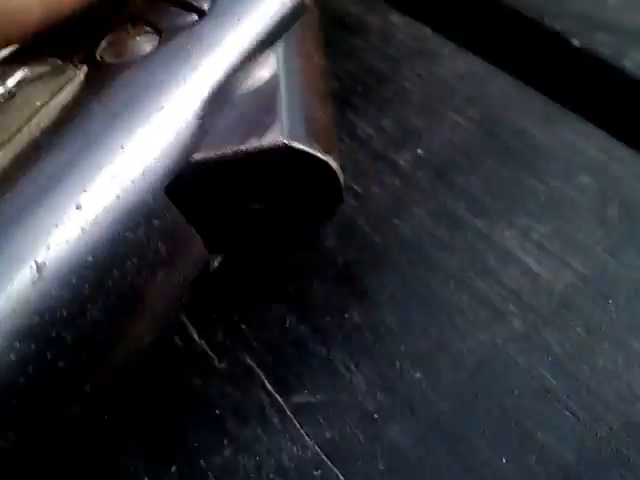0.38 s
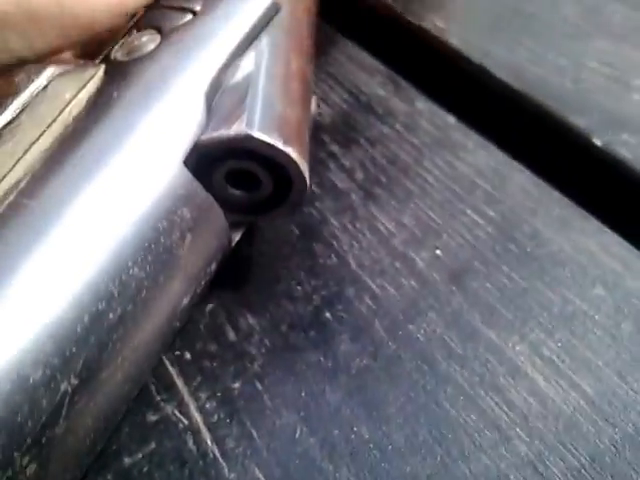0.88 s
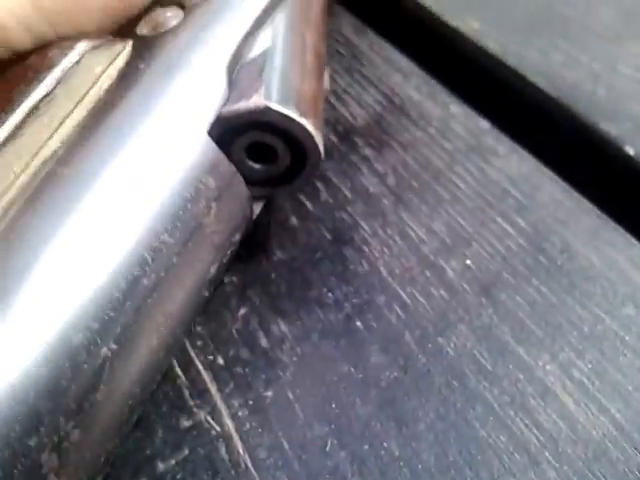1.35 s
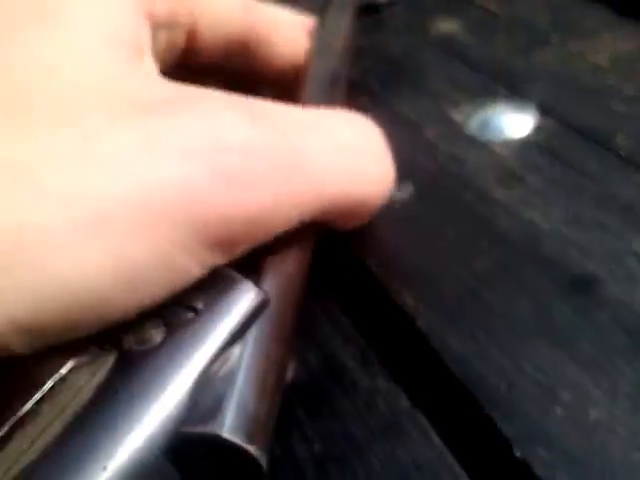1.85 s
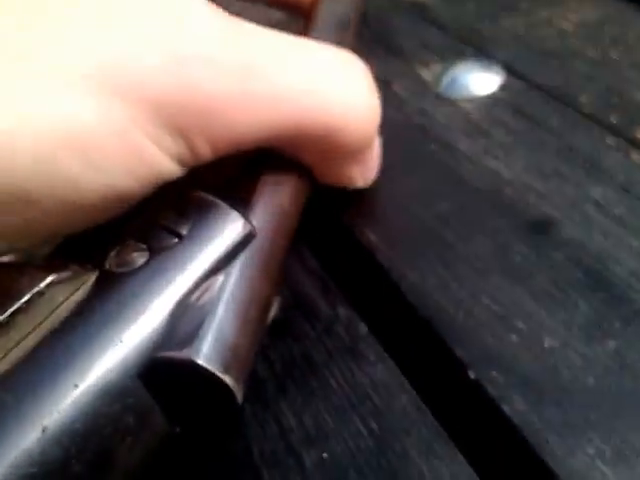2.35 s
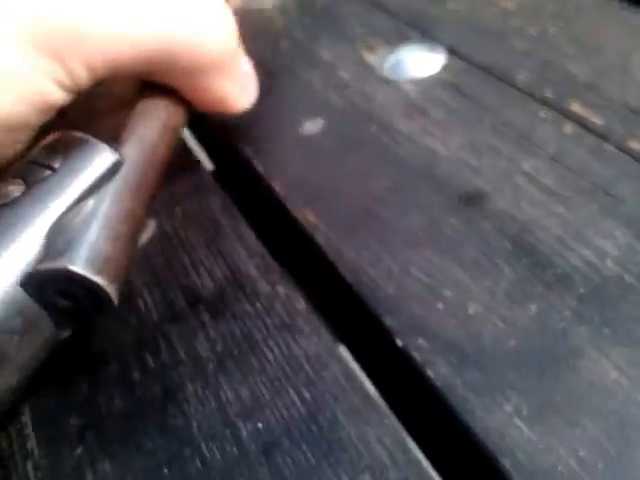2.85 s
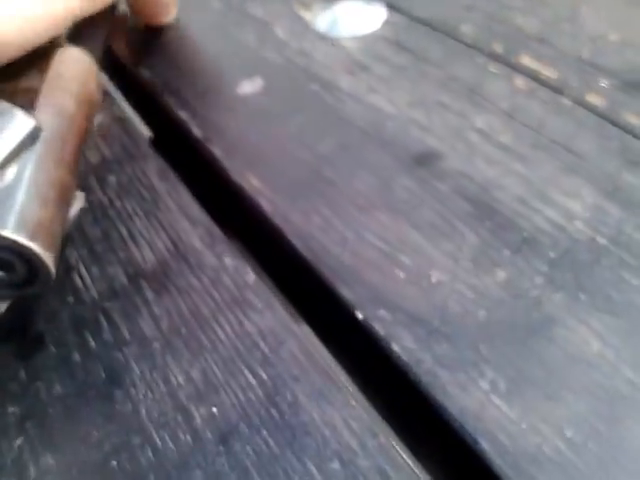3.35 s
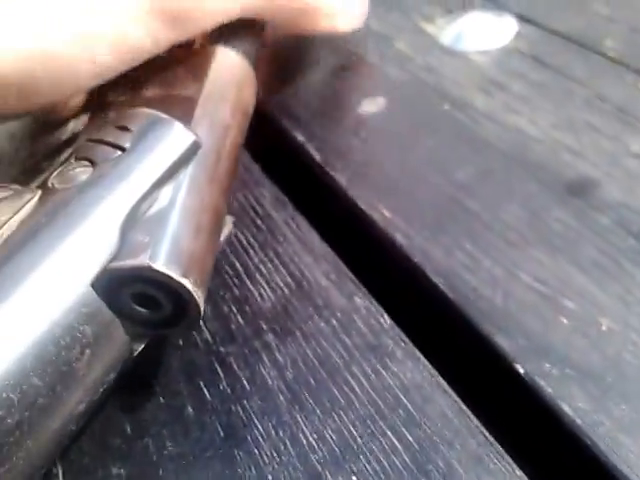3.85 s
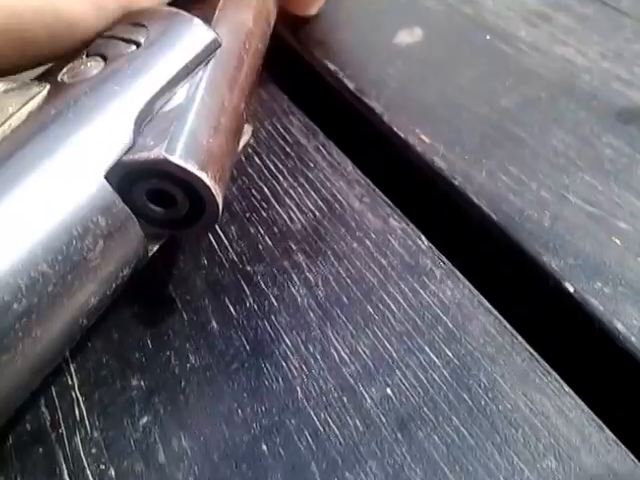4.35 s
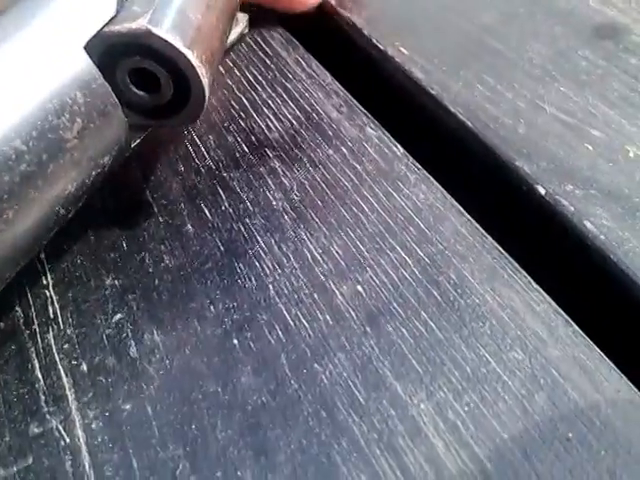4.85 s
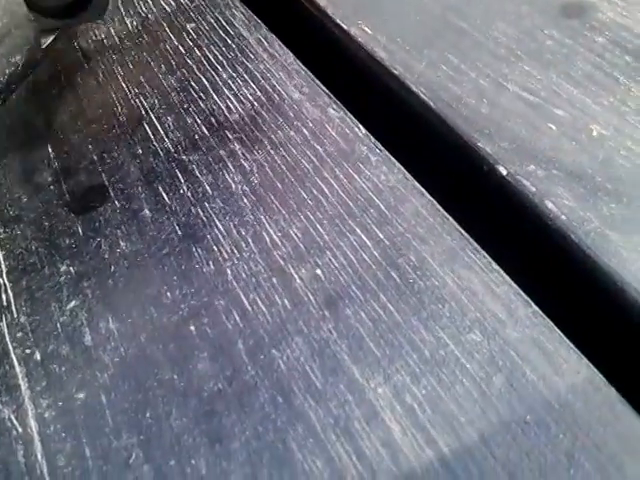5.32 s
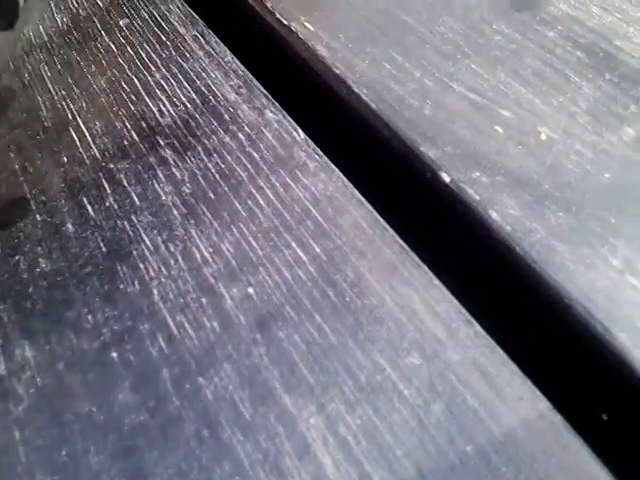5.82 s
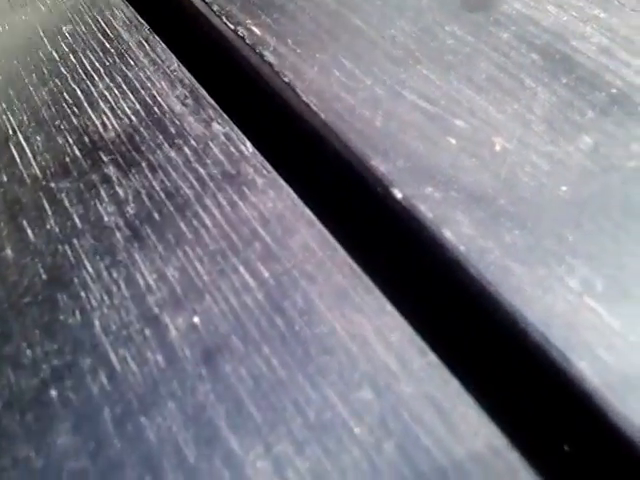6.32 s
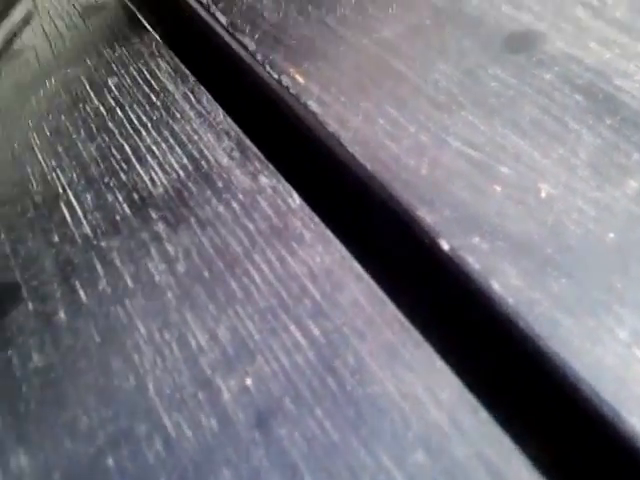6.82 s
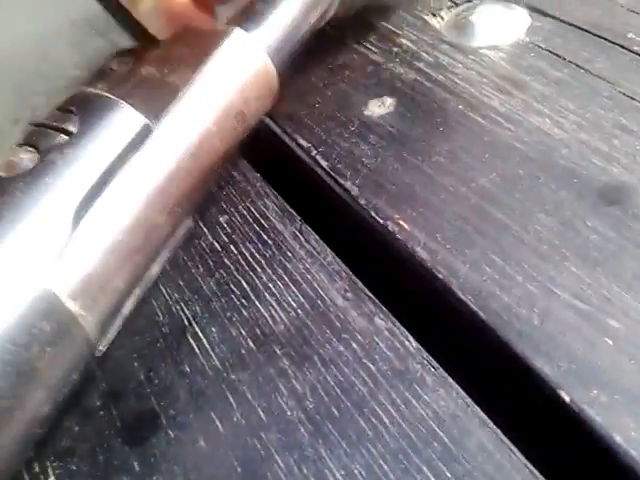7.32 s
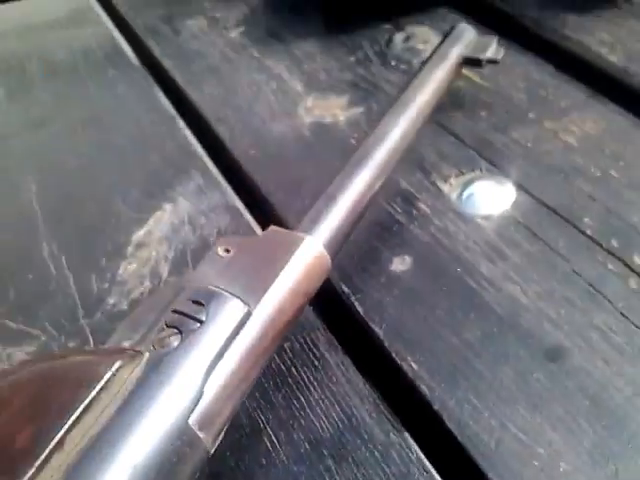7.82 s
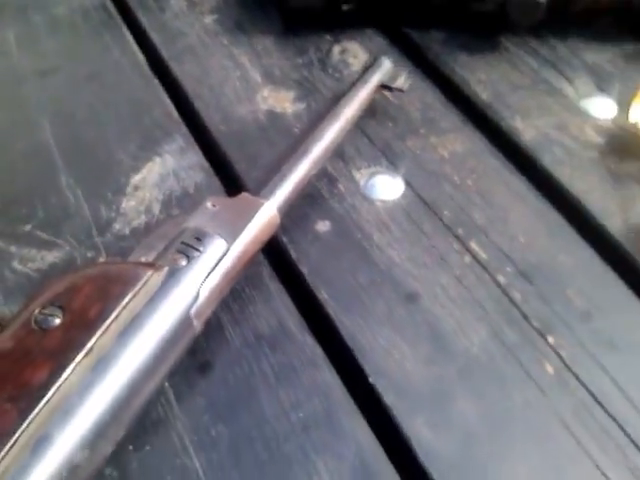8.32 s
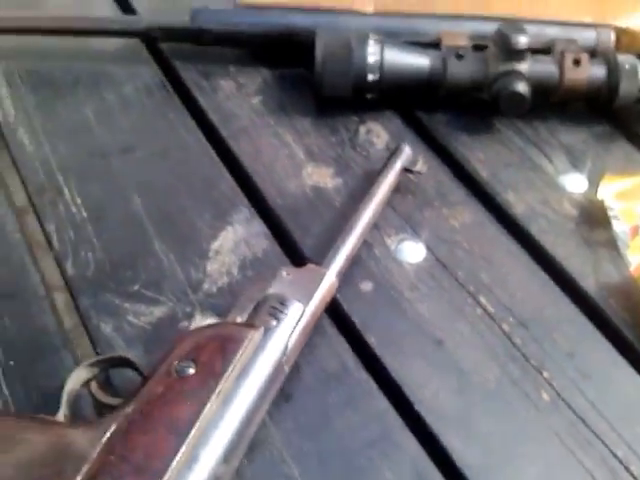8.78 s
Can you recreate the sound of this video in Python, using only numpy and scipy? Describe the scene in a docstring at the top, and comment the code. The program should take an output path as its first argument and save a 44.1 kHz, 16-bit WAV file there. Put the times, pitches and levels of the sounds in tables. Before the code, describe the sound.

Outdoors up close, an old air pistol knocks on hollow wooden planks, steel ticking, then its barrel snaps shut loudly amid wind buffeting.

```python
"""Light wind buffets the microphone over an even outdoor hiss, then a hand starts to rub along an air pistol.
Close to a hand-held camera the break-barrel pistol is turned over on a plank table: it knocks on the planks,
its steel parts tick and the barrel is snapped shut. Knocks are sums of decaying plank modes; ticks, rubs and
the latch are shaped noise; the wind is deep noise with separate bumps and single-cycle thumps."""
import sys
import numpy as np
from scipy import signal
from scipy.fft import rfft, irfft, next_fast_len
from scipy.io import wavfile
from scipy.ndimage import uniform_filter1d, map_coordinates

SR = 44100
rng = np.random.default_rng(int(sys.argv[2]) if len(sys.argv) > 2 else 0)


def decibels_to_gain(level_db):
    """Convert a level in decibels to a linear amplitude gain (20 dB per decade)."""
    exponent = np.asarray(level_db, float) / 20
    return 10 ** exponent


def wav_record(signal):
    """Record a signal, one row per channel, as 16-bit PCM in the file named by sys.argv[1]."""
    frames = np.transpose(np.atleast_2d(signal))
    bounded = np.clip(frames, -1, 1)
    # unit amplitude maps onto the largest positive 16-bit level
    quanta = np.round(bounded * 32767).astype(np.int16)
    wavfile.write(sys.argv[1], SR, quanta)


N = 404397  # samples, about 9.2 s


def unit(x):
    """Scales a signal to rms 1."""
    return x / np.sqrt(np.mean(x ** 2) + 1e-20)


def along(points, hz):
    """Reads (Hz, dB) points on a log frequency axis."""
    f, v = np.transpose(points)
    return np.interp(np.log(hz + 1), np.log(f + 1), v)


def level(rows, axis=1):
    """Gain per sample from a dB column; -120 dB outside the rows."""
    rows = np.array(rows)
    return decibels_to_gain(np.interp(np.arange(N) / SR, rows[:, 0], rows[:, axis], -120, -120))


def wobble(rate):
    """A smooth random curve with rate knots a second."""
    knots = rng.standard_normal(int(N * rate / SR) + 4)
    return map_coordinates(knots, [np.arange(N) * rate / SR])


def coloured(x, spectrum):
    """x through a causal (minimum-phase) filter with the given spectrum."""
    m = next_fast_len(len(x) + 8192)
    log_gain = along(spectrum, np.fft.rfftfreq(m, 1 / SR)) * np.log(10) / 20
    cepstrum = irfft(log_gain, m)
    # folding the cepstrum onto positive time gives the minimum phase
    cepstrum[1:m // 2] *= 2
    cepstrum[m // 2 + 1:] = 0
    return irfft(rfft(x, m) * np.exp(rfft(cepstrum)), m)[:len(x)]


def patchy(spectrum, patch_db):
    """Coloured noise of rms 1 with patches of random gain in time and pitch."""
    z = signal.stft(rng.standard_normal(N + SR), nperseg=512)[2]
    field = uniform_filter1d(rng.standard_normal(z.shape), size=6, axis=0)  # across pitch
    field = uniform_filter1d(field, size=12, axis=1)  # across time
    noise = signal.istft(z * decibels_to_gain(patch_db * unit(field)), nperseg=512)[1][:N]
    return unit(coloured(noise, spectrum))


def swell(s, peak_db, hold, rise, fade):
    """Gain per sample: rises to its peak at s, holds, then fades (slopes in dB per second)."""
    t = np.arange(N) / SR - s
    return decibels_to_gain(peak_db + rise * np.minimum(t, 0) - fade * np.maximum(t - hold, 0))


# Leaves and far hiss around the table. Each row: time in seconds, level in dB.
AIR_LEVEL = [(0, -50.5), (1.05, -53), (2.3, -51.5), (3.75, -53), (4.2, -51.5), (5.6, -52.5), (6.5, -52),
             (7.2, -52.5), (9.17, -53.5)]
# Colour of that hiss at the microphone. Each row: frequency in Hz, relative density in dB per Hz.
AIR_COLOUR = [(15, -34), (25, 0.5), (70, -8.5), (105, -0.5), (124, -16), (238, -8.5), (377, -7), (494, -8),
              (1030, -12.5), (2200, -13), (3300, -15), (5840, -6), (8770, -23), (15100, -29.5),
              (16400, -30)]


def air():
    """Even outdoor hiss, peaked by the microphone port."""
    return level(AIR_LEVEL) * decibels_to_gain(0.5 * wobble(12)) * patchy(AIR_COLOUR, patch_db=1.5)


# Wind on the microphone between gusts. Each row: time in seconds, level in dB.
STEADY_WIND = [(0, -58), (.65, -51.5), (1.15, -62), (1.7, -57), (2.05, -66), (2.33, -57), (2.68, -62.5),
               (3.45, -56), (3.9, -55), (4.9, -65), (5.35, -61.5), (5.7, -61), (6.6, -66.5), (7.05, -53),
               (7.3, -51.5), (7.7, -59.5), (8.1, -66.5), (9.17, -71)]
# Gusts on the microphone. Each row: time at full strength in seconds, level in dB, hold in seconds,
# fade in dB per second.
WIND_GUSTS = [(0.04, -43, 0.11, 600), (0.232, -44, 0.0083, 303), (0.473, -36, 0.0089, 350),
              (0.863, -40.5, .01, 56), (1.256, -43, .01, 138), (1.494, -41.5, .05, 150),
              (1.891, -32.5, 0.097, 540), (2.121, -45.5, .01, 92), (2.745, -46.5, .01, 150),
              (2.876, -48, .01, 400), (3.038, -43.5, 0.14, 103), (3.264, -37, 0.011, 64),
              (3.59, -45, .01, 600), (3.706, -42.5, .01, 290), (4.058, -42.5, 0.04, 100),
              (4.166, -35, 0.043, 78), (4.512, -49.5, 0.011, 140), (4.703, -44.5, 0.096, 125),
              (4.976, -42.5, .01, 120), (5.16, -56, .01, 90), (5.5, -56, .01, 120), (6.1, -52.5, .01, 64),
              (6.46, -47, .04, 154), (8.528, -49, .01, 500), (8.645, -52.5, 0.011, 477),
              (8.846, -41, 0.0074, 126), (9.09, -54, .01, 144)]
# Colour of the wind rumble at the microphone. Each row: frequency in Hz, relative level in dB.
RUMBLE_COLOUR = [(12, -41.5), (20, -4), (60, -2), (125, -0.5), (207, -10.5), (358, -23), (398, -25.5),
                 (544, -35.5), (700, -37.5), (910, -75.5), (1540, -120)]


def wind():
    """Eddies push on the microphone port; stronger gusts add separate, sharper bumps."""
    rise_db_per_s, pushes_per_s = 504, 70
    gust = level(STEADY_WIND)
    for s, db, hold, fade in WIND_GUSTS:
        gust = gust + swell(s, db, hold, rise_db_per_s, fade)
    rumble = unit(decibels_to_gain(4.0 * wobble(30)) * patchy(RUMBLE_COLOUR, patch_db=2.0))
    pushes = (rng.random(N) < pushes_per_s / SR) * rng.standard_normal(N)
    bumps = unit(coloured(pushes, [(40, -19.5), (110, 0.0), (220, 5.5), (420, -9), (900, -56)]))
    # the bumps grow faster than the rumble as the gust strengthens
    return gust * rumble + decibels_to_gain(8.0) * gust ** 1.41 * bumps


# Single strong eddies at the microphone. Each row: start in seconds, level in dB of the sine before its
# envelope, pitch in Hz.
EDDIES = [(0.031, -33, 115), (0.116, -34, 135), (1.889, -32, 84), (1.931, -18.5, 102), (1.964, -11.5, 120),
          (1.989, -32, 98), (3.598, -34, 72.7), (4.172, -25, 108), (4.187, -27, 73.5), (4.229, -28, 210),
          (4.259, -34, 140), (4.288, -25, 91), (4.379, -30, 195), (4.747, -35.5, 167), (4.777, -24.5, 72)]


def thumps():
    """A strong eddy swings the diaphragm through about one cycle."""
    out, t = np.zeros(N + SR), np.arange(SR // 10) / SR
    for s, level_db, hz in EDDIES:
        cycles = t * hz
        envelope = np.exp(-((cycles - 0.8) / 0.39) ** 2) * np.tanh(2 * cycles) ** 2
        out[round(s * SR):][:len(t)] += decibels_to_gain(level_db) * np.sin(2 * np.pi * cycles) * envelope
    return out[:N]


# Skin and metal sliding close to the microphone. Each row: time of the peak in seconds, length in seconds,
# then the peak levels of hiss, scuff and sizzle in dB.
RUB_STROKES = [(0.28, 0.45, -53, -55.5, -79), (0.468, 0.19, -46.5, -51, -78), (.98, 0.61, -50, -57, -72),
               (1.207, 0.055, -36, -43, -72), (1.48, 0.096, -51, -57, -64), (2.315, .13, -49.5, -54.5, -77),
               (2.79, 0.096, -53.5, -65.5, -70), (2.9, 0.11, -45, -48, -66), (3.059, 0.11, -49.5, -50, -61),
               (3.179, 0.12, -47, -51, -62), (3.31, 0.13, -45.5, -49.5, -78), (5.186, .2, -66, -52, -74),
               (5.6, 0.1, -58, -53.5, -72), (5.835, .09, -52, -76, -61), (7.187, 0.68, -50.5, -58.5, -65),
               (8.39, 0.04, -51, -70, -54.5), (8.497, 0.15, -38.5, -61.5, -46),
               (8.78, 0.049, -44, -54, -60), (8.835, 0.034, -35, -51, -52), (8.862, 0.045, -30, -51, -39.5)]


def strokes():
    """Gains per sample of hiss, scuff and sizzle: each rub swells to its peak and fades, in a rounded arch."""
    gains = np.zeros((3, N))
    for s, length, *layers_db in RUB_STROKES:
        span = np.arange(round((s - length / 2) * SR), round((s + length / 2) * SR))
        arch = np.cos(np.pi * (span / SR - s) / length).clip(0) ** 1.2
        gains[:, span] += decibels_to_gain(np.array(layers_db)[:, None]) * arch
    return gains


# Colour of the skin's hiss along the pistol. Each row: frequency in Hz, relative level in dB.
SKIN_COLOUR = [(1060, -52), (1800, -9), (3490, -6.5), (3850, -2.5), (5260, -3.5), (6060, 3.5),
               (8500, -15.5), (11000, -41), (18700, -120)]


def rubs():
    """Sliding: gritty hiss from the skin, a dull scuff through the wood and a fine sizzle on close strokes."""
    scuff_colour = [(150, -29), (400, 9.5), (900, 5.5), (1800, 0.0), (3500, -18.5)]
    sizzle_colour = [(5000, -39.5), (8500, 5.5), (12000, -3), (16000, -11.5)]
    grit = decibels_to_gain(2.5 * wobble(350) + 1.2 * wobble(45))  # one roughness shared by the three layers
    hiss = unit(grit * patchy(SKIN_COLOUR, patch_db=2.5))
    scuff = unit(grit * patchy(scuff_colour, patch_db=0.5))
    sizzle = unit(grit * patchy(sizzle_colour, patch_db=2.0))
    return (strokes() * [hiss, scuff, sizzle]).sum(0)


# Colour of the barrel latch close up. Each row: frequency in Hz, relative level in dB.
LATCH_COLOUR = [(590, -32), (1000, -6.5), (1210, -29), (1950, -1.5), (2730, -16.5), (3750, -7),
                (4360, -9.5), (5450, 3.5), (6490, -5), (9010, -18), (14200, -26.5), (16400, -39.5)]


def snap():
    """The latch rattles densely as the barrel closes, then is cut short, leaving a faint buzz."""
    start_s, hold_s, rattle_db, rise_db_per_s = 6.639, 0.016, -4, 4999.5
    buzz_db = -16.5  # against the rattle
    rattle = swell(start_s, rattle_db, hold_s, rise_db_per_s, fade=4500)
    buzz = swell(start_s, rattle_db + buzz_db, hold_s, rise_db_per_s, fade=499.5)
    chatter = unit(decibels_to_gain(1.9 * wobble(400)) * patchy(LATCH_COLOUR, patch_db=0.0))
    return (rattle + buzz) * chatter


# Steel ticks close to the microphone. Each row: start in seconds, crack level in dB (before a common 5.5 dB
# cut), fall by 60 dB in seconds, then the lower clack and the sharp edge in dB against the crack.
STEEL_TICKS = [(0.469, -25.5, 0.0054, -8, -27.5), (0.4893, -21, 0.0051, -11, -19),
               (0.8664, -35, 0.021, 10.5, -33), (1.1196, -22, 0.0031, -17, -32),
               (1.3915, -32, 0.0094, -21, -27), (1.4835, -30, 0.014, -29, -21),
               (1.873, -30.5, 0.008, -34, -18), (3.2512, -44.5, 0.021, 14, -31),
               (3.3034, -21.5, 0.011, -11, -40), (3.3986, -31, 0.0091, -2, -18),
               (3.477, -21.5, 0.022, 2, -38), (3.6856, -35, 0.022, 1.5, -31), (4.0952, -16.5, 0.01, 0, -52),
               (5.1047, -22.5, 0.012, -9, -16), (5.1403, -31, 0.008, -7, -16),
               (5.155, -27.5, 0.028, -5.5, -25), (5.2016, -47.5, 0.013, 11.5, -25),
               (5.2964, -21, 0.017, -24, -14.5), (5.6468, -22, 0.014, 10.5, -42),
               (6.0985, -31.5, 0.019, 16, -30.5), (6.4268, -35.5, 0.013, -4, -13.5),
               (6.4528, -21.5, 0.023, -1.5, -27), (6.4555, -11.5, 0.028, -9, -17),
               (6.4711, -13.5, 0.024, -18.5, -32), (6.5046, -36, 0.01, -4, -31.5),
               (6.6343, -2, 0.0052, -22, -24), (6.6384, 8, 0.016, -26.5, -20),
               (6.656, -4, 0.021, -5, -14.5), (6.819, -41.5, 0.0086, -32, 0),
               (7.3932, -30, 0.0088, 6.5, -29), (7.4023, -24, 0.012, -2, -37.5),
               (8.1536, -34.5, 0.0084, -16, -4), (8.1681, -26, 0.0082, -1, -7),
               (8.2332, -22, 0.012, -33, -6), (8.4932, -18, 0.0092, -3, -25),
               (8.6236, -6, 0.0067, -20, -14), (8.687, -25, 0.0073, -13, -13.5),
               (8.7213, -8, 0.0055, -11, -15), (8.743, -27.5, 0.008, -7, -12), (8.784, -20, 0.012, 4, -5.5),
               (8.788, -8.5, 0.0078, -2.5, -20), (8.8400, 1.5, 0.0075, -11.5, -11),
               (8.8484, -12, 0.0076, -2.5, -14), (8.9152, -18, 0.0099, -13, -12)]
# Colour of the crack of steel. Each row: frequency in Hz, relative level in dB.
CRACK_COLOUR = [(1060, -41), (1800, -12), (2800, -9.5), (4160, -7.5), (6060, -0.5), (6860, -5.5),
                (8500, -15.5), (11000, -39), (18700, -120)]


def ticks():
    """Steel on steel: a crack a few milliseconds long, a lower clack from the frame, a sharp edge on top."""
    clack_colour = [(300, -23.5), (900, -5.0), (1600, 0.8), (2500, -2.5), (5000, -40.5)]
    edge_colour = [(5000, -42), (8500, 3.5), (11000, 0.8), (16000, -10.5), (18000, -21.0)]
    parts, t = np.zeros((3, N + SR)), np.arange(SR // 20) / SR
    for s, crack_db, t60, clack_db, edge_db in STEEL_TICKS:
        envelope = decibels_to_gain(-60 * t / t60) * (1 - np.exp(-t / 0.00031))
        burst = rng.standard_normal((3, len(t))) * envelope
        burst[:, SR // 2500] += 4.5  # the contact itself is one sharp spike
        parts_db = crack_db - 5.5 + np.array([[0], [clack_db], [edge_db]])
        parts[:, round(s * SR):][:, :len(t)] += decibels_to_gain(parts_db) * burst
    total = np.zeros(N + SR)
    for part, colour in zip(parts, (CRACK_COLOUR, clack_colour, edge_colour)):
        noise_gain = np.std(coloured(rng.standard_normal(SR), colour))
        total += coloured(part, colour) / noise_gain  # the colour leaves the level of noise unchanged
    return total[:N]


# Knocks on the table at close range. Each row: start in seconds, level in dB (9.5 dB above the rms of the
# first 20 ms), centre of the ring in Hz, spread in octaves, damping factor.
TABLE_KNOCKS = [(0.451, -32, 960, 0.37, .75), (0.469, -35.5, 221, .9, 0.34), (0.868, -11, 592, 0.53, 0.97),
                (1.118, -37, 1120, 1.1, 0.77), (1.2397, -14, 597, 0.42, 0.78),
                (1.354, -26.5, 540, 0.43, 1.6), (1.483, -32.5, 229, 0.54, .84),
                (1.51, -22.5, 576, 0.42, 1.07), (1.754, -30.5, 377, 0.88, 0.97),
                (2.107, -32.5, 450, .9, 0.62), (2.278, -37.5, 692, .9, 0.88), (2.308, -15, 467, 0.68, 0.82),
                (2.884, -33, 473, 0.63, 0.73), (3.251, -16.5, 347, 0.61, 1.3), (3.299, -31, 220, 1.3, 0.39),
                (3.477, -30, 1220, 0.94, 0.78), (3.6824, -14, 543, 0.48, 0.95), (4.093, -5.5, 594, 0.41, 1),
                (4.227, -25.5, 240, 0.54, 2.7), (4.644, -44, 1420, 0.34, 1.4), (5.646, -9, 1220, 0.92, 1.3),
                (5.659, -14.5, 965, 0.92, 0.78), (5.761, -31, 516, 0.87, 0.93),
                (6.096, -20, 900, 1.2, 0.98), (6.455, -21.5, 610, 1.27, 0.76), (6.597, -26, 1340, 1.2, 0.9),
                (6.638, -5.5, 1833, 1.4, 0.81), (6.646, 3, 404, 1.04, 0.87), (6.656, -20.5, 113, .3, .86),
                (7.103, -27, 840, 0.78, 0.93), (7.177, -37, 586, 0.86, 0.86), (7.393, -12, 347, 0.95, 0.84),
                (7.405, -26, 145, 0.56, 0.88), (8.848, -24.5, 1925, 0.3, 3.2)]
# Modes of the planks. Each row: frequency in Hz, relative level in dB, fall by 60 dB in seconds at damping 1.
PLANK_MODES = [(113, -10.5, 0.84), (145, -10.5, 0.48), (203, -7, 0.44), (254, -2.5, 0.23), (337, -5, 0.33),
               (358.6, -2, .26), (411, -0.5, 0.1), (488.2, -1, .16), (602.6, -2.9, 0.23), (652, -4, 0.14),
               (729, -5.5, 0.24), (758, 1.5, 0.12), (913, -1, 0.16), (946, -10.5, 0.11), (1000, -16, 0.11),
               (1222, -3.5, 0.14), (1418, -1, 0.1), (1510, -18, 0.027), (1700, 0, 0.046),
               (1885, -0.5, 0.11), (1930, -18, 0.063), (2280, -13.5, 0.087), (2520, -9, 0.13),
               (3020, -11, 0.056), (3530, -7, 0.065), (4230, -9, 0.087)]


def knocks():
    """Each blow rings the plank modes near its centre and chatters in a dense, damped thud."""
    contact_s = 0.012  # how long the pistol chatters on the wood after the first touch
    out, t = np.zeros(N + SR), np.arange(SR // 2) / SR
    hz, db, t60 = np.transpose(PLANK_MODES)[:, :, None]

    def sine(pitch):
        return np.sin(2 * np.pi * pitch * t)

    for s, level_db, centre_hz, spread, damping in TABLE_KNOCKS:
        draw = rng.standard_normal((8, *hz.shape))
        distance = np.log2(hz / centre_hz) / spread
        weight_db = db - 14 * np.log1p(0.51 * distance ** 2)
        ring_gain = np.sign(draw[0]) * decibels_to_gain(weight_db + 1.1 * draw[1] - 60 * t * damping / t60)
        ring = (ring_gain * sine(hz)).sum(0)
        # hand and pistol load the planks: detuned, more damped neighbours around every mode
        loaded_gain = np.sign(draw[2:5]) * decibels_to_gain(weight_db + 2.0 - 60 * t * damping * 1.89 / t60)
        loaded = (loaded_gain * sine(hz * (1 + 0.07 * draw[5:]))).sum((0, 1))
        # the first touch, then rough contact until the pistol settles
        force = 0.07 * rng.standard_normal(SR // 10) * np.exp(-(t[:SR // 10] / contact_s) ** 2)
        force[0] = 0.96
        blow = 0.76 * ring + signal.fftconvolve(loaded, force)[:len(t)]
        blow *= 1 - np.exp(-t / 0.0014)  # wood yields: the onset is slightly rounded
        early_rms = np.sqrt(np.mean(blow[:SR // 50] ** 2))
        out[round(s * SR):][:len(t)] += decibels_to_gain(level_db - 9.5) * blow / early_rms
    return out[:N]


def scene():
    """Everything as heard at one microphone close to the table."""
    return (knocks() + ticks() + rubs() + snap() + wind() + thumps() + air())[None]


def low_pass(x):
    """Removes everything above the highest recorded frequency."""
    return signal.sosfilt(signal.butter(12, 16510, fs=SR, output="sos"), x)


def record(dry):
    """The microphone rolls off the deepest bass, below 22 Hz; the input clips at full scale."""
    rolled_off = signal.sosfilt(signal.butter(2, 22, "highpass", fs=SR, output="sos"), dry)
    clipped = np.clip(rolled_off, -1, 1)
    return low_pass(clipped)


dry = scene()
out = record(dry)
wav_record(out)
```